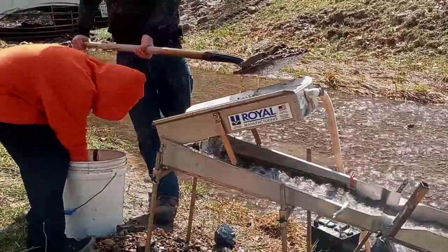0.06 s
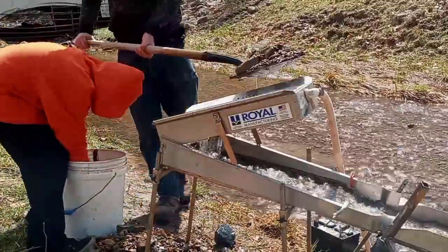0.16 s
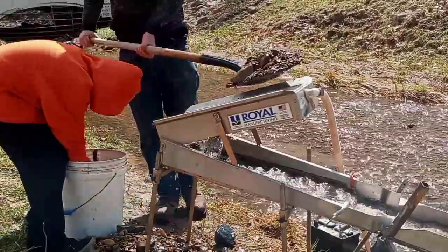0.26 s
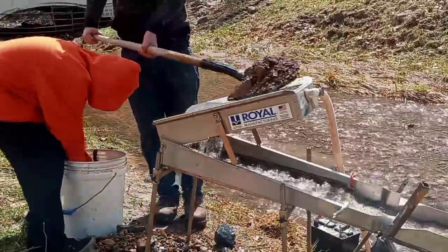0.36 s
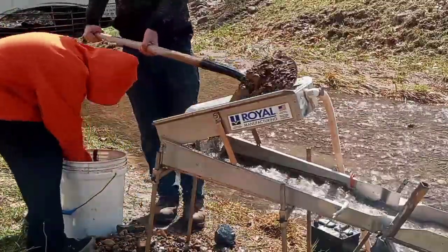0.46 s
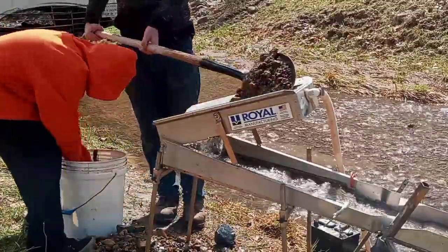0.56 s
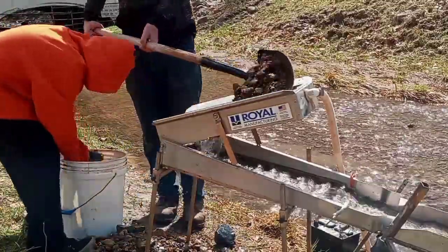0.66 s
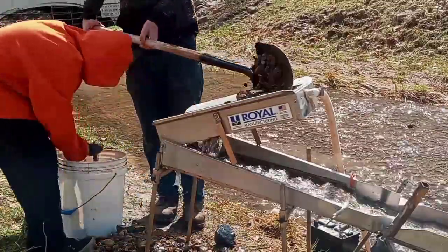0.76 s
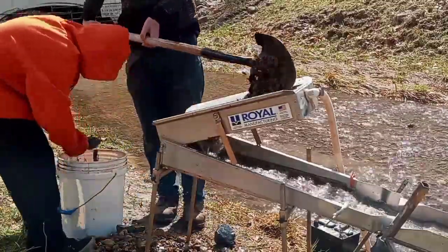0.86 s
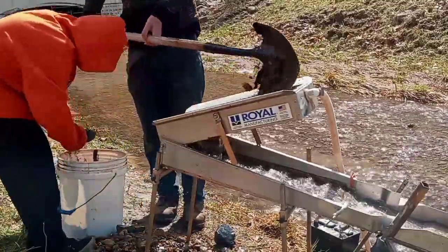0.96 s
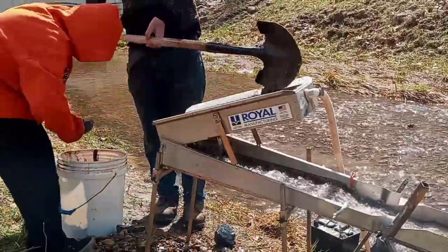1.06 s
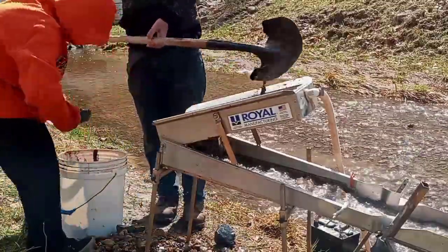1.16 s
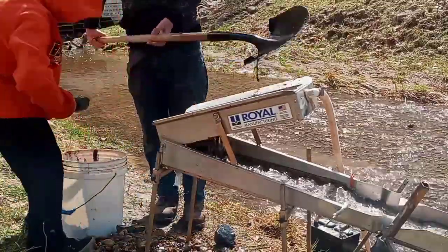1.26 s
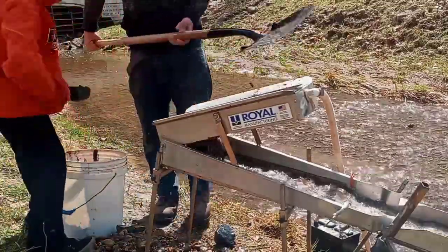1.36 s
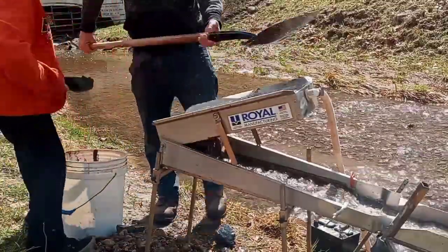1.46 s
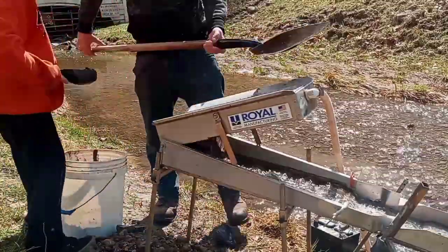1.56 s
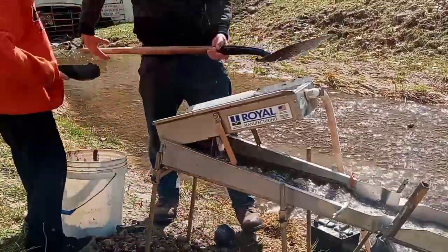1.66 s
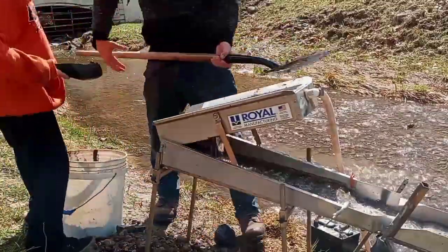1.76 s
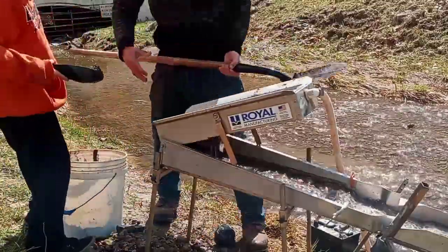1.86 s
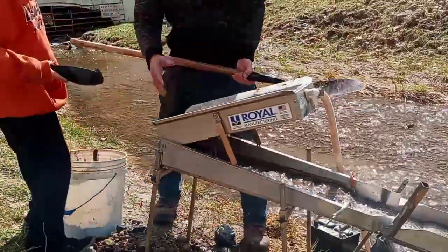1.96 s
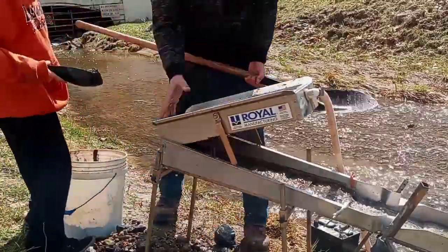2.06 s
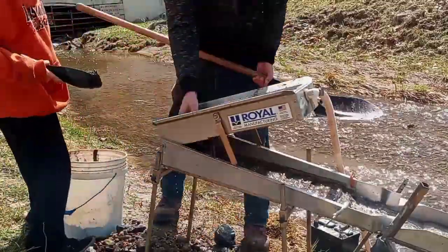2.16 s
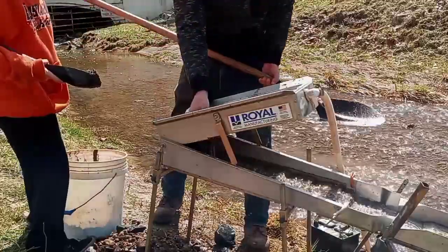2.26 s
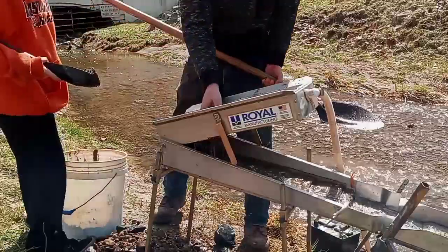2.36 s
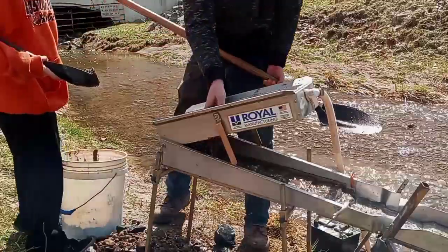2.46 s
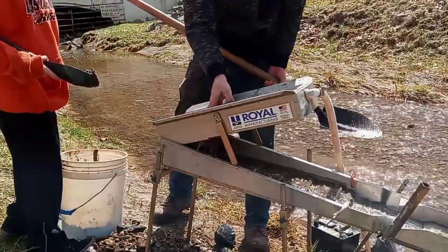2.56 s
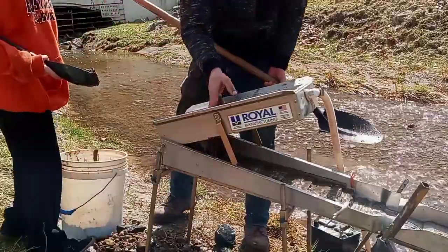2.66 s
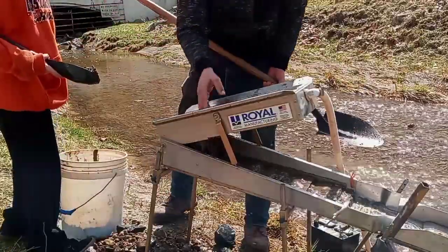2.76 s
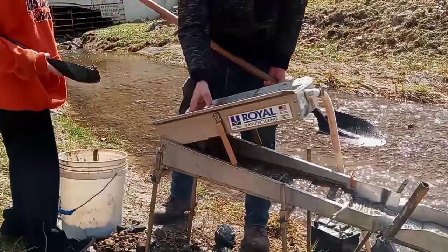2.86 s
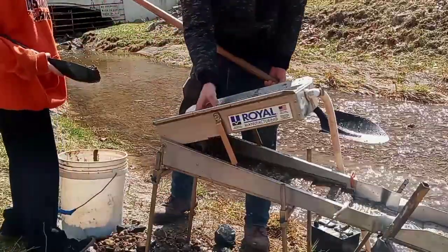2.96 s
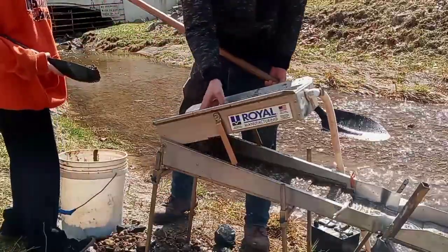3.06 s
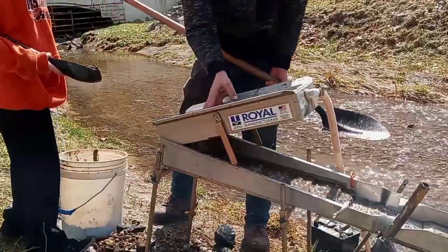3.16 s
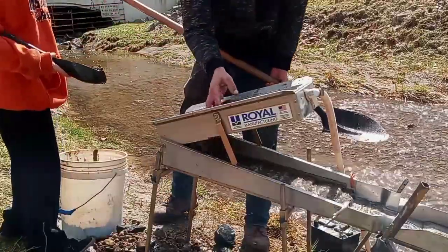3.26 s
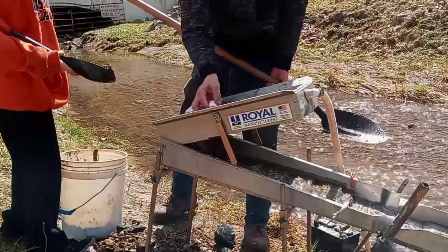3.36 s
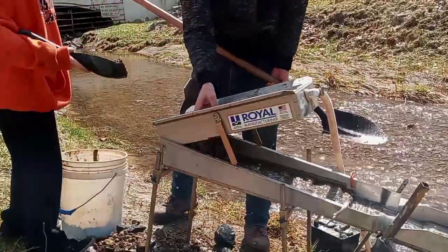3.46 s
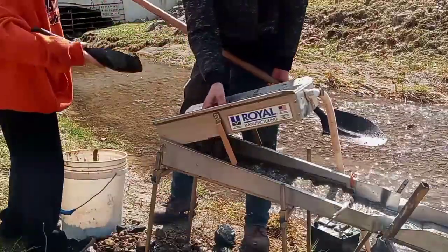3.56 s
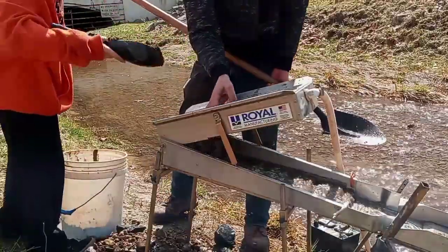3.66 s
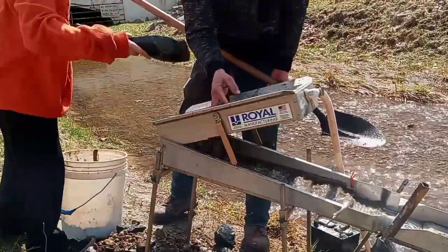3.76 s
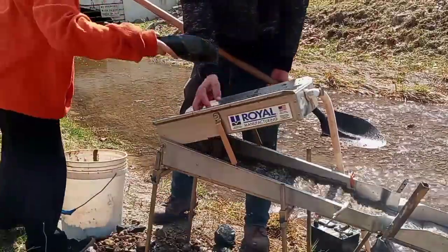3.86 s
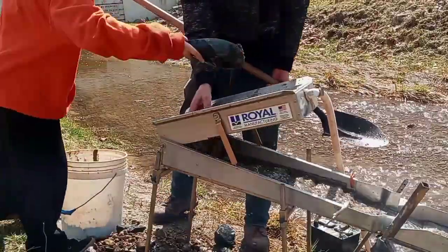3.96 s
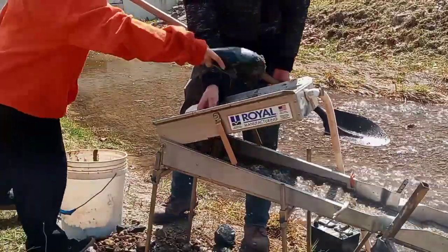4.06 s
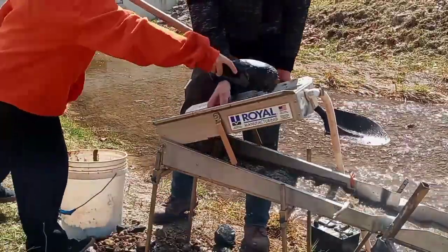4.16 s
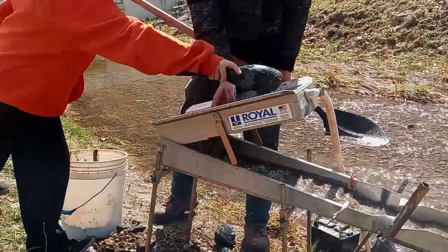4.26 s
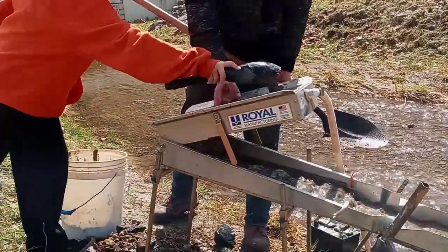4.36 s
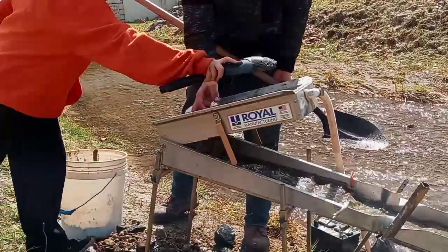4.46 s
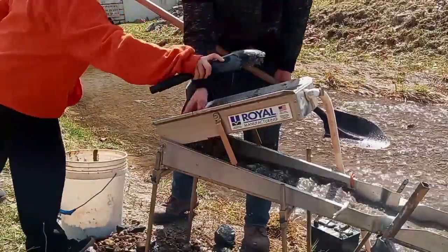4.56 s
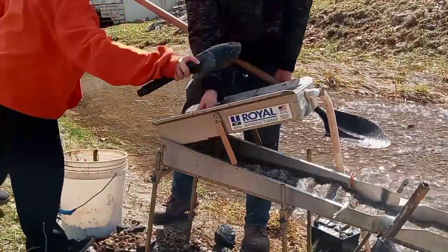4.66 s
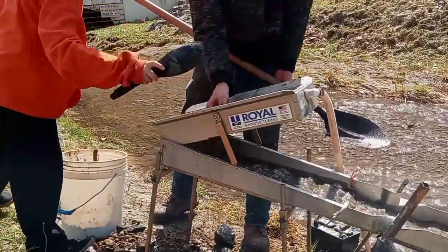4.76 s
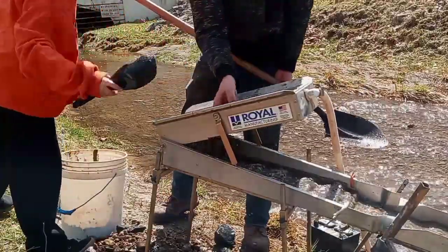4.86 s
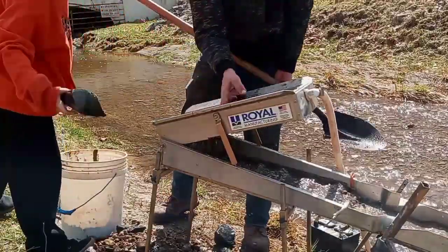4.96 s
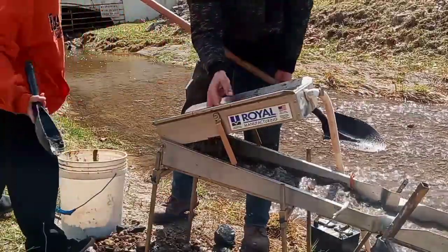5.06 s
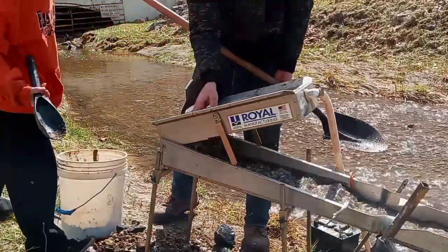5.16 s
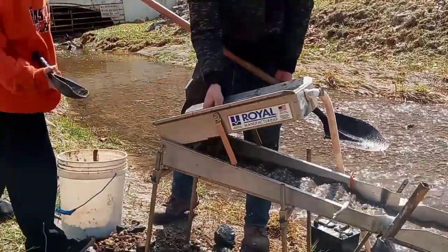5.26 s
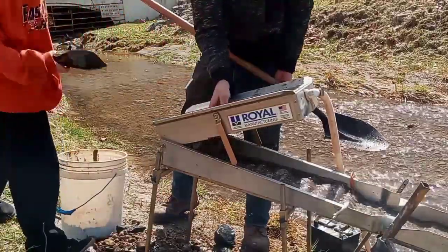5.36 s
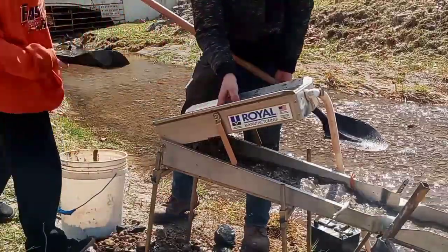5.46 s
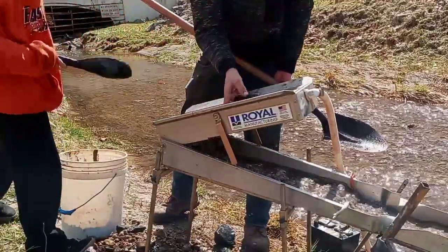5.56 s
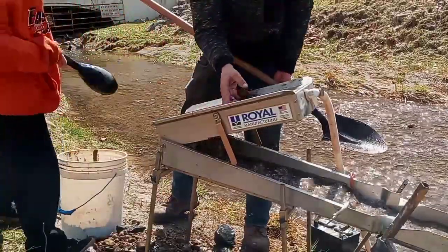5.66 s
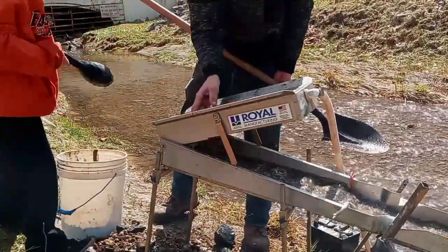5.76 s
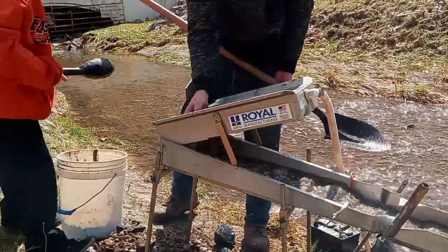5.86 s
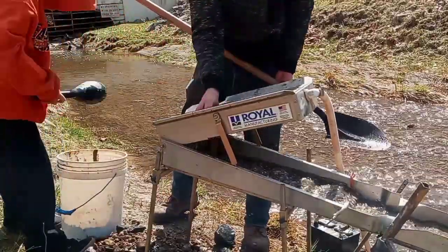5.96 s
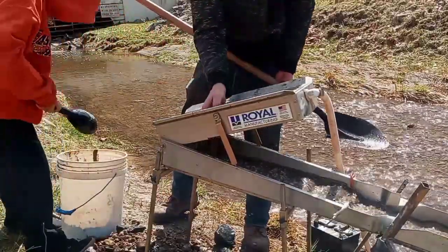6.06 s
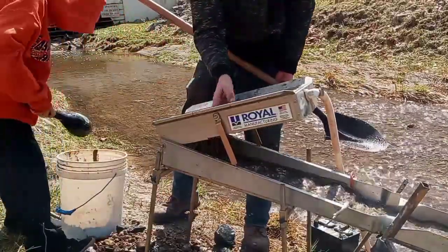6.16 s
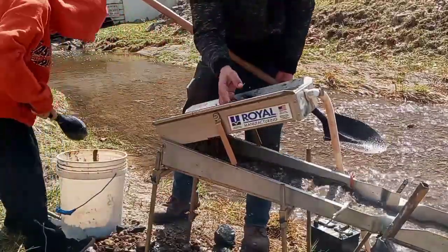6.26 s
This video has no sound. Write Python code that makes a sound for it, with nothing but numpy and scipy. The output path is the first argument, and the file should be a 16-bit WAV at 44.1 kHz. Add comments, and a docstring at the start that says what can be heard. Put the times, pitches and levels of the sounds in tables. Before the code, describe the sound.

Outdoors, close to a metal sluice, water rushes, gurgles and spatters without pause. A shovelful of wet gravel and stones crashes into the hopper within the first second, hissing and ringing. Hand strokes then rattle and drum through the stones, a small scoop adds a little more, and gritty scraping continues. A very faint distant engine appears late. The small microphone sounds thin in the bass.

```python
"""Water rushes, gurgles and spatters down a metal sluice: coloured noise, chirping bubble grains, stray drops.
Wet gravel slides in as showers of impacts, hissing and drumming while larger stones ring the hopper's modes.
Pebbles click, a shovel bumps the hopper and its blade rings under sliding grit; later a hand rakes the load.
A scoop adds more, grit scrapes over the screen as clumped grains, and a faint far engine drones late on
as a few unsteady sines."""
import sys
import numpy as np
from scipy import signal
from scipy.fft import rfft, irfft, next_fast_len
from scipy.io import wavfile
from scipy.ndimage import map_coordinates

SR = 44100
rng = np.random.default_rng(int(sys.argv[2]) if len(sys.argv) > 2 else 0)


def to_wav(sig):
    """Store sig (one row per channel, or 1-D mono) as 16-bit WAV at the path in sys.argv[1].

    Samples outside -1..1 are clipped; the rate is SR.
    """
    pcm = np.clip(np.atleast_2d(sig), -1, 1) * 32767
    pcm = np.round(pcm).astype(np.int16)
    wavfile.write(sys.argv[1], SR, pcm.T)  # frames by channels


N = 277830
TOP_HZ = 15750  # ceiling for grain pitches and for the finished sound


def amp(db):
    """Decibels to gain."""
    return 10 ** (np.asarray(db) / 20)


def unit(x):
    """Scale to rms 1."""
    return x / np.sqrt(np.mean(x ** 2) + 1e-20)


def curves(rows):
    """One value per sample for each column after the time."""
    s, *columns = np.transpose(rows)
    return [np.interp(np.arange(N) / SR, s, column) for column in columns]


def wobble(rate):
    """A smooth random curve, rate knots a second."""
    knots = rng.standard_normal(int(N * rate / SR) + 4)
    return map_coordinates(knots, [np.arange(N) * rate / SR])


def colour(x, points):
    """Causal minimum-phase filter whose gain follows (Hz, dB) points."""
    size = next_fast_len(N + SR // 2, real=True)
    size += size % 2
    hz, db = np.transpose(points)
    log_hz = np.log(np.fft.rfftfreq(size, 1 / SR) + 1)
    gain = amp(np.interp(log_hz, np.log(hz), db))
    # folding the cepstrum forward in time makes the filter causal
    cepstrum = irfft(np.log(gain), size)
    cepstrum[1:size // 2] *= 2
    cepstrum[size // 2 + 1:] = 0
    return irfft(rfft(x, size) * np.exp(rfft(cepstrum)), size)[:N]


def add(track, s, sound):
    """Mix a sound into a track at time s."""
    start = max(round(s * SR), 0)
    track[start:start + len(sound)] += sound[:len(track[start:])]


def impacts(rate, spread_db):
    """Random impulses of either sign, rms 1; a wider spread gives many small and a few large."""
    draws = rng.random((int(rate * N / SR), 3))
    when, strength, side = draws.T
    sizes = amp(spread_db * np.minimum(-np.log(1 - strength), 4))
    return unit(np.bincount((when * N).astype(int), sizes * np.sign(side - .5), N))


def grains(rate, centre_hz, octaves, cycles, spread_db, glide, size=700):
    """A shower of short damped sines of rms 1, each at its own pitch and gliding upward if glide > 0."""
    draws = rng.random((int(rate * N / SR), 4))
    when, pitch_a, pitch_b, strength = draws.T[:, :, None]
    hz = np.minimum(centre_hz * 2 ** (octaves * (pitch_a - pitch_b)), TOP_HZ)
    turns = hz * np.arange(size) / SR
    age = turns / cycles
    sizes = amp(spread_db * np.minimum(-np.log(1 - strength), 4))
    envelope = sizes * np.exp(-age) * np.linspace(1, 0, size)
    waves = envelope * np.sin(2 * np.pi * turns * (1 + glide * age))
    places = (np.floor(when * N) + np.arange(size)).astype(int)
    return unit(np.bincount(places.ravel(), waves.ravel(), N)[:N])


def bursts(rate, life, spread_db):
    """An envelope of rms 1: random sudden rises, each dying away over life seconds."""
    energy = impacts(rate, spread_db) ** 2
    decay = np.exp(-2 / (abs(life) * SR))
    return unit(np.sqrt(signal.lfilter([1], [1, -decay], energy)))


def trough(x, echo_db, t60, size=1100):
    """The metal sides throw back a few ms of dense reflections, which change as the spot of impact moves."""
    t = np.arange(SR // 20) / SR
    echoes = np.zeros(N)
    for start in range(0, N, size):
        tail = rng.standard_normal(len(t)) * amp(-60 * t / t60)
        tail /= np.linalg.norm(tail)
        add(echoes, start / SR, signal.fftconvolve(x[start:start + size], tail))
    return x + amp(echo_db) * echoes


# tone of the rushing water: pitch_hz [Hz], relative_db [dB]
RUSH_TONE = [(71, -44), (120, -20.5), (219, -3), (259, -13), (401, -2), (491, -6), (1000, -3), (1340, -2.5),
             (1900, -6), (2500, -6.5), (3410, -9), (4100, -12), (9500, -40.5), (12400, -72), (20900, -120)]
# tone of the fine spray: pitch_hz [Hz], relative_db [dB]
SPRAY_TONE = [(2000, -27), (5000, -4), (8500, -14.5), (11500, -9), (15000, -2.5)]


def water():
    """Steady rush over the riffles; each splash throws up bubbles and fine spray, and tiny bubbles tick as they burst."""
    splash = bursts(rate=170, life=0.0057, spread_db=4.0)
    rush_db = -42.0 + 0.85 * wobble(2.24) + 0.34 * wobble(30)
    rush = amp(rush_db) * unit(colour(rng.standard_normal(N), RUSH_TONE))
    gurgle = grains(rate=350, centre_hz=756, octaves=1.35, cycles=5.3, spread_db=1, glide=0.029)
    plops = grains(rate=55, centre_hz=1045, octaves=1.258, cycles=9.5, spread_db=0.0, glide=0.042, size=1400)
    bubbles = grains(rate=1100, centre_hz=2930, octaves=0.934, cycles=5.3, spread_db=2.5, glide=0.02)
    bubbles = bubbles * np.sqrt(splash)
    fizz = grains(rate=450, centre_hz=12820, octaves=0.39, cycles=8.5, spread_db=4.0, glide=0, size=300)
    droplets = trough(impacts(rate=2000, spread_db=2.5), echo_db=-3.0, t60=0.019) * splash
    mist = amp(0.5) * rng.standard_normal(N)
    spray = unit(colour(droplets + mist, SPRAY_TONE))
    low_water = rush + amp(-43.5) * gurgle + amp(-46.5) * plops
    return low_water + amp(-42.5) * bubbles + amp(-54) * fizz + amp(-45.5) * spray


# drops landing close by: start_s [s], level_db [dB, before the tone filter]
NEAR_DROPS = [(0.041, -24), (0.399, -23), (1.676, -29), (1.85, -24), (2.087, -27), (2.214, -19.5),
              (4.351, -20), (4.392, -23), (5.198, -22.5)]
# tone of a drop's tick: pitch_hz [Hz], gain_db [dB]
DROP_TONE = [(2000, -23), (8000, -17), (12000, -3.5), (15000, -2)]
DROP_T60_S = 0.014


def drops():
    """Drops land close by as bright, fast-dying noise ticks; small rising plips come at random moments."""
    ticks = np.zeros(N)
    t = np.arange(SR // 50) / SR
    for s, db in NEAR_DROPS:
        add(ticks, s, amp(db - 60 * t / DROP_T60_S) * rng.standard_normal(len(t)))
    plips = grains(rate=14, centre_hz=3250, octaves=0.4, cycles=8.7, spread_db=2.0, glide=0.018)
    return amp(-58.5) * plips + colour(ticks, DROP_TONE)


# gravel slumping in from shovel or scoop, clod by clod; levels are for the flow at full strength:
# start_s [s], length_s [s], rattle_db [dB], sand_db [dB], drumming_db [dB]
CLODS = [(0.175, 0.031, -39, -59, -49), (0.556, 0.01, -37, -32.5, -52), (0.653, 0.014, -31, -31, -56),
         (0.685, 0.04, -27, -28, -47), (0.765, 0.054, -27, -35.5, -35), (0.848, 0.15, -29, -36.5, -37.5),
         (1.053, 0.16, -37, -44.5, -57), (1.284, 0.025, -38, -39.5, -61), (4.252, 0.084, -34.5, -44, -43),
         (4.412, 0.024, -32.5, -43, -44)]
# a pour builds up and settles in proportion to its length; its wet sand lands first
POUR_RISE_SHARE, SETTLE_DB_PER_LENGTH = 0.23, 6.5
LANDING_DB, LANDING_SHARE = -1, 0.4  # extra sand, relative to its flow
# the last pebbles trickle down the metal, so the walls ring on after the rattle
POUR_WALL_DB, TRICKLE_DB_PER_LENGTH = -4.5, 5.5  # wall ring relative to the rattle


def pours():
    """Power of (rattle, wall ring, sand, drumming) as each load slides in, keeps flowing and settles."""
    power = np.zeros((4, N))
    for s, length, rattle_db, sand_db, drum_db in CLODS:
        progress = np.maximum(np.arange(N) / SR - s, 0) / length
        rise = np.minimum(progress / POUR_RISE_SHARE, 1)
        after = np.maximum(progress - 1, 0)
        flow = np.sqrt(rise) * amp(-SETTLE_DB_PER_LENGTH * after)
        trickle = rise ** 2 * amp(POUR_WALL_DB - TRICKLE_DB_PER_LENGTH * after)
        landing = 1 + amp(LANDING_DB) * np.exp(-(progress / LANDING_SHARE) ** 2)
        power += np.array([amp(rattle_db) * flow, amp(rattle_db) * trickle,
                           amp(sand_db) * flow * landing, amp(drum_db) * flow]) ** 2
    return power


# once loaded, the running water keeps the gravel stirring
LOADED_S = 0.45
STIR_RATTLE_DB, STIR_WALL_DB, STIR_SAND_DB, STIR_DRUM_DB = -45, -62, -57, -50


def gravel_levels():
    """Rattle, wall ring, sand hiss and drumming in dB: the powers of pouring, raking and stirring summed."""
    loaded = np.arange(N) / SR > LOADED_S
    stir_gains = amp([STIR_RATTLE_DB, STIR_WALL_DB, STIR_SAND_DB, STIR_DRUM_DB])
    stirring = (stir_gains[:, None] * loaded) ** 2
    return 10 * np.log10(pours() + rakes() + stirring + 1e-12)


# ringing modes of the wet, loaded hopper: pitch_hz [Hz], level_db [dB, relative], t60_s [s]
HOPPER_MODES = [(270, -11, 0.022), (344.6, -2.5, 0.063), (383, 3.5, 0.054), (413.8, 5, 0.051),
                (549.9, 1.5, 0.028), (726, -4.5, 0.036), (888, -1.5, 0.043), (1075, -2.5, 0.026),
                (1158, -0.5, 0.038), (1360, 0.5, 0.019), (1560, -3.5, 0.032), (1674, -2.5, 0.035),
                (1820, -1.5, 0.023), (2190, 5, 0.0091), (2870, -8, 0.009), (3550, -13, 0.014)]


def hopper_ring(pitch_hz, focus_db, scatter_db, detune):
    """One blow as (floor, walls) at peak 1; the spot favours wall modes near pitch_hz, the load detunes them all."""
    t = np.arange(SR // 6) / SR
    hz, db, t60 = np.transpose(HOPPER_MODES)[:, :, None]
    # neighbouring modes start in opposition, so the floor swells slowly
    sign = (-1) ** np.arange(len(hz))[:, None]
    loaded_hz = hz * (1 + detune * rng.standard_normal())
    mode_db = db + scatter_db * rng.standard_normal(hz.shape) - 60 * t / t60
    modes = sign * amp(mode_db) * np.sin(2 * np.pi * loaded_hz * t)
    place = amp(-focus_db * np.abs(np.log2(hz / pitch_hz)))  # focus in dB per octave
    low = hz[:, 0] < 550  # these modes belong to the floor
    floor = modes[low].sum(0)
    wall = (place * modes)[~low].sum(0)
    return [ring / np.abs(ring).max() for ring in (floor, wall)]


# tone of the rattling pebbles: pitch_hz [Hz], relative_db [dB]
RATTLE_TONE = [(250, -29.5), (450, -4), (750, -3), (1200, 4), (1900, -2), (3000, -6), (4500, -9),
               (7000, -28), (15000, -34)]
# tone of the hissing wet sand: pitch_hz [Hz], relative_db [dB]
SAND_TONE = [(1500, -27), (3000, 11), (6000, 0), (8500, -3.5), (11000, 0.5), (15000, 2)]
FLOW_SHARE = 0.16  # small grit keeps running between the clumps


def gravel():
    """Pebbles tumble in clumps, click on each other and drum on the hopper; wet sand hisses along."""
    rattle_db, wall_db, sand_db, drum_db = gravel_levels()
    floor, wall = hopper_ring(pitch_hz=1280, focus_db=5, scatter_db=0, detune=0)
    clumps = unit(FLOW_SHARE + bursts(rate=230, life=0.017, spread_db=1.5))
    pebbles = unit(colour(impacts(rate=2500, spread_db=1.5) * clumps, RATTLE_TONE))
    clinks = grains(rate=260, centre_hz=1544, octaves=1.14, cycles=4.5, spread_db=3.0, glide=0)
    rattle = amp(-4) * pebbles + amp(-5) * clinks
    wall_hits = impacts(rate=900, spread_db=1) * clumps
    walls = unit(signal.fftconvolve(wall_hits, wall)[:N])
    floor_hits = impacts(rate=200, spread_db=0.0)
    drumming = unit(signal.fftconvolve(floor_hits, floor)[:N])
    grit = impacts(rate=3000, spread_db=3.5) * clumps
    sand = unit(colour(trough(grit, echo_db=-2, t60=0.021), SAND_TONE))
    return amp(rattle_db) * rattle + amp(wall_db) * walls + amp(drum_db) * drumming + amp(sand_db) * sand


# larger stones striking the hopper: start_s [s], wall_ring_db [dB], floor_boom_db [dB],
# crack_db [dB, before the tone filter], favoured_wall_pitch_hz [Hz]
STONE_HITS = [(0.202, -17.5, -36.5, -27, 990), (0.222, -23, -43, -33, 1280),
              (0.562, -19.5, -38, -20.5, 910), (0.674, -31, -42, -15.5, 1500),
              (0.692, -12.5, -46, -17, 1210), (0.737, -13, -20, -16, 930), (0.742, -11, -12.5, -28, 1700),
              (0.772, -19, -35, -18, 1150), (0.778, -15, -31, -21, 1150), (0.805, -14, -23, -18, 1400),
              (0.814, -8.5, -18, -15, 780), (0.866, -14, -25.5, -22, 1640), (0.898, -13, -24, -19, 1360),
              (0.916, -15, -26.5, -16.5, 1240), (0.956, -12, -21, -23, 1120), (0.976, -16, -28, -28, 1000),
              (1.006, -18.5, -17.5, -17, 1340), (1.047, -28, -34, -24, 1450), (1.077, -13.5, -30, -17, 940),
              (1.102, -29, -28, -28, 1150), (1.2, -26, -38, -24, 1200), (1.222, -15.5, -43, -33, 880),
              (1.431, -16, -43, -25, 1260), (2.445, -18, -42, -28, 1250), (2.468, -22, -52, -32, 1540),
              (2.562, -19, -37, -36, 1050), (2.593, -15.5, -32, -29, 1160), (2.616, -18, -29, -23, 1160),
              (2.734, -24.5, -25, -47, 875), (3.096, -15.5, -45, -27, 1290), (3.21, -19.5, -24, -26, 730),
              (3.22, -14, -40, -34, 1130), (3.287, -25, -30, -46, 710), (3.301, -15, -34, -26.5, 1060),
              (3.438, -20.5, -32, -35, 1160), (3.757, -9, -20.5, -30, 870), (3.816, -19, -47, -35, 1370),
              (4.459, -17, -33, -23, 726), (4.836, -30, -33, -33, 1300), (4.92, -19, -28, -27, 1200),
              (4.947, -18, -20.5, -18, 620), (5.31, -23, -39, -23.5, 1000), (5.42, -30, -27, -32, 1200),
              (5.524, -21, -32, -30, 1340), (5.607, -26, -34, -29, 1090), (6.266, -17.5, -43, -31, 900)]
# a stone rocks over its edges: nominal_delay_s [s after the first contact], level_db [dB re wall ring]
ROCKING_EDGES = [(0, -1), (0.0032, -3), (0.0068, -6)]
# tone of the crack of contact: pitch_hz [Hz], gain_db [dB]
CRACK_TONE = [(250, -31), (600, 6), (1300, 4.5), (3000, 3), (6000, -15), (9000, -18.5), (15000, -14)]
CRACK_T60_S = 0.051
FLOOR_LAG_S = 0.0019  # the heavy floor answers a little later
THUMP_HZ, THUMP_DB, THUMP_T60_S = 182, -21.5, 0.032  # the whole hopper gives; dB relative to the boom
# stones that boom less than a heavy one rock less: extra loss at each further edge, dB per dB of boom
HEAVY_DB, LIGHT_LOSS = -21, 0.35


def stones():
    """Each stone cracks on the metal, rocks onto its other edges within a few ms and thumps the floor."""
    rings, cracks = np.zeros(N), np.zeros(N)
    t = np.arange(SR // 6) / SR
    thump = amp(THUMP_DB - 60 * t / THUMP_T60_S) * np.sin(2 * np.pi * THUMP_HZ * t)
    for s, wall_db, boom_db, crack_db, hz in STONE_HITS:
        loss_db = LIGHT_LOSS * max(HEAVY_DB - boom_db, 0)
        for k, (delay, contact_db) in enumerate(ROCKING_EDGES):
            floor, wall = hopper_ring(pitch_hz=hz, focus_db=11.5, scatter_db=1.5, detune=0.02)
            contact_s = s + delay * rng.uniform(0.78, 1.175)
            add(rings, contact_s, amp(wall_db + contact_db - k * loss_db) * wall)
        # one boom per stone, on the floor ring of its last edge
        add(rings, s + FLOOR_LAG_S, amp(boom_db) * (floor + thump))
        add(cracks, s, amp(crack_db - 60 * t / CRACK_T60_S) * rng.standard_normal(len(t)))
    return rings + colour(cracks, CRACK_TONE)


# sharp clicks, of pebbles knocking together and of drops landing close by: start_s [s], level_db [dB, before
# the tone filters], pitch_hz [Hz]
SHARP_CLICKS = [(0.408, -21.5, 3020), (1.2665, -23, 3190), (1.776, -22.5, 2600), (1.7835, -20.5, 3260),
                (1.85, -26, 3500), (1.9354, -20, 3130), (2.041, -24, 3100), (2.217, -19.5, 3300),
                (2.8806, -12, 2580), (3.128, -20, 3050), (4.147, -24, 3580), (4.949, -18, 2900),
                (4.9855, -14.5, 3000), (5.298, -23, 3640), (5.375, -19, 2760), (6.089, -19, 2790)]
# tone of the snap, which carries no bass: pitch_hz [Hz], gain_db [dB]
SNAP_TONE = [(700, -20), (1300, 5), (1900, -0.5), (4200, 0.5), (6000, -6)]
# tone of the tick of contact: pitch_hz [Hz], gain_db [dB]
TICK_TONE = [(1000, -30), (2000, -4), (4500, 4), (8500, -19), (11500, -2), (15000, -3)]
TICK_DB, TICK_T60_S = -12, 0.016  # relative to the snap, before the tone filters


def clicks():
    """A bright noise tick of contact, with a dry snap of two or three cycles and its reflections."""
    snaps, ticks = np.zeros(N), np.zeros(N)
    t = np.arange(SR // 40) / SR
    for s, db, hz in SHARP_CLICKS:
        age = t * hz / .6  # the snap peaks after 0.6 cycle
        snap = np.sin(2 * np.pi * hz * t) * age * np.exp(1 - age)
        add(snaps, s, amp(db) * snap)
        add(ticks, s, amp(db + TICK_DB - 60 * t / TICK_T60_S) * rng.standard_normal(len(t)))
    return colour(trough(snaps, echo_db=-8, t60=0.025), SNAP_TONE) + colour(ticks, TICK_TONE)


# the shovel bumping the hopper, whose floor rings freely: start_s [s], peak_db [dB]
SHOVEL_BUMPS = [(0.565, -25.5), (0.666, -27.5)]
BUMP_HZ, BUMP_ATTACK_S, BUMP_T60_S = 413.5, 0.015, 0.098
# grit sliding off the tipped shovel: time_s [s], level_db [dB]
GRIT_SLIDE = [(0.66, -55), (0.7, -31), (0.92, -29), (1.17, -36.5), (1.3, -36.5), (1.5, -47)]
# ringing modes of the shovel blade: pitch_hz [Hz], level_db [dB, relative], t60_s [s]
BLADE_MODES = [(1165, 0, 0.035), (1360, -1, 0.019), (1576, -1, 0.017)]


def shovel():
    """The shovel bumps the hopper, a softly rising ring; its blade's modes sing under the grit that slides off."""
    bumps = np.zeros(N)
    t = np.arange(SR // 4) / SR
    swell = (1 - np.exp(-t / BUMP_ATTACK_S)) * amp(-60 * t / BUMP_T60_S)
    ring = swell * np.sin(2 * np.pi * BUMP_HZ * t)
    for s, db in SHOVEL_BUMPS:
        add(bumps, s, amp(db) * ring / ring.max())
    blade = np.zeros(len(t))
    for k, (hz, db, t60) in enumerate(BLADE_MODES):
        blade += (-1) ** k * amp(db - 60 * t / t60) * np.sin(2 * np.pi * hz * t)
    s, db = np.transpose(GRIT_SLIDE)
    level = amp(np.interp(np.arange(N) / SR, s, db, left=-120, right=-120))
    grit = impacts(rate=1300, spread_db=2.0) * bursts(rate=130, life=0.011, spread_db=0.0)
    return bumps + level * unit(signal.fftconvolve(grit, blade)[:N])


# strokes of the hand through the gravel, levels at full push:
# start_s [s], length_s [s], rattle_db [dB], sand_db [dB], drumming_db [dB, at the end of the stroke]
HAND_STROKES = [(2.32, .1, -36, -50, -55), (2.428, 0.22, -32, -40, -39.5), (2.676, 0.19, -37, -55, -39),
                (2.918, 0.41, -34, -46, -39.5), (3.367, 0.27, -43.5, -72, -43.5),
                (3.664, 0.18, -36.5, -46.5, -40.5), (4.789, 0.21, -34.5, -40, -41),
                (5.007, 0.042, -35.5, -61, -40), (5.344, 0.11, -35.5, -47.5, -43),
                (5.439, 0.21, -34, -43.5, -38), (5.854, 0.23, -40, -44, -43.5),
                (6.064, 0.035, -31, -36, -46), (6.138, 0.13, -31, -40, -38.5)]
RAKE_ATTACK_S, RAKE_RELEASE_DB_PER_S = 0.022, 159
HEAP_DB = 5  # the drumming grows over a stroke as the pebbles heap up
RAKE_WALL_DB = -4  # wall ring relative to the rattle


def rakes():
    """Power of (rattle, wall ring, sand, drumming) as each stroke starts, pushes a heap along and stops."""
    power = np.zeros((4, N))
    for s, length, rattle_db, sand_db, drum_db in HAND_STROKES:
        age = np.maximum(np.arange(N) / SR - s, 0)
        attack = np.minimum(age / RAKE_ATTACK_S, 1)
        push = attack * amp(-RAKE_RELEASE_DB_PER_S * np.maximum(age - length, 0))
        heap = amp(HEAP_DB * (np.minimum(age / length, 1) - 1.0))
        power += np.array([amp(rattle_db) * push, amp(rattle_db + RAKE_WALL_DB) * push,
                           amp(sand_db) * push, amp(drum_db) * push * heap]) ** 2
    return power


# grit scraping over the screen: start_s [s], length_s [s], level_db [dB, top of the swell]
GRIT_SCRAPES = [(4.266, 0.094, -37), (4.84, 0.17, -31.5), (5.454, 0.22, -38.5), (6.075, 0.028, -34),
                (6.158, 0.14, -34.5)]
SCRAPE_SWELL_DB = 5.5


def scrapes():
    """Grit dragged over the screen crunches in fits, swells and stops short."""
    level = np.zeros(N)
    for s, length, db in GRIT_SCRAPES:
        progress = np.linspace(0, 1, round(length * SR))
        swell = amp(db + SCRAPE_SWELL_DB * (progress - 1))
        add(level, s, swell * signal.windows.tukey(len(progress), .2))
    grit = grains(rate=3500, centre_hz=2710, octaves=0.68, cycles=4.4, spread_db=2.5, glide=0)
    return level * unit(grit * bursts(rate=320, life=0.012, spread_db=1.0))


# distant engine, all but silent up to the first row: time_s [s], firing_rate_hz [Hz], level_db [dB]
ENGINE_RUN = [(4.8, 58, -79), (5.22, 62, -56.5), (5.45, 64.5, -54.5), (5.9, 64.8, -55.5), (6.3, 63.2, -57)]
# tones of the engine: order [multiple of firing rate], level_db [dB, relative]
ENGINE_ORDERS = [(1, -5), (1.5, -1), (2, 5), (2.88, 6.5)]


def engine():
    """A far engine, of which only a few low tones carry, unsteady in level and phase."""
    rate_hz, db = curves(ENGINE_RUN)
    phase = 2 * np.pi * np.cumsum(rate_hz) / SR
    drone = np.zeros(N)
    for order, level_db in ENGINE_ORDERS:
        loudness = amp(level_db + 1.5 * wobble(10.0))
        drone += loudness * np.sin(order * phase + 0.2 * order * wobble(16))
    return amp(db) * drone


def scene():
    """Everything heard from one spot in the open air."""
    wet = water() + drops()
    load = gravel() + stones() + clicks()
    return (wet + load + shovel() + scrapes() + engine())[None]


# the microphone's bass roll-off: pitch_hz [Hz], gain_db [dB]
MIC_BASS = [(30, -30), (60, -26), (90, -20.5), (130, -8), (200, -6.5), (300, 0)]


def record(dry):
    """The small microphone loses the bass; nothing passes above the band limit."""
    size = next_fast_len(N + SR // 2)
    thin = colour(dry[0], MIC_BASS)
    in_band = np.fft.rfftfreq(size, 1 / SR) < TOP_HZ
    return irfft(rfft(thin, size) * in_band, size)[None, :N]


dry = scene()
out = record(dry)
to_wav(out)
```